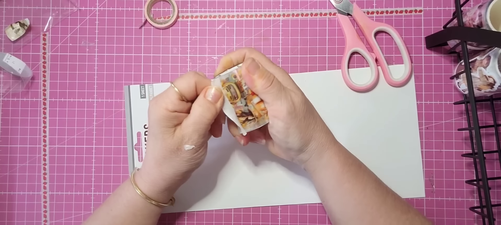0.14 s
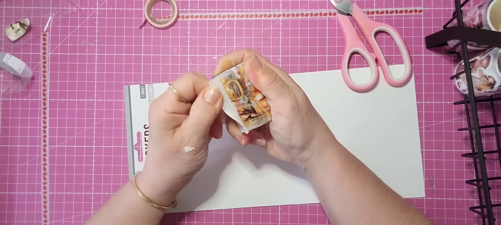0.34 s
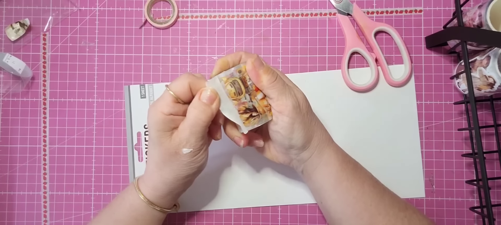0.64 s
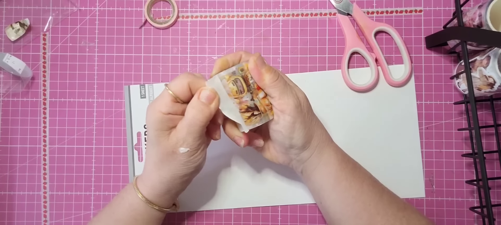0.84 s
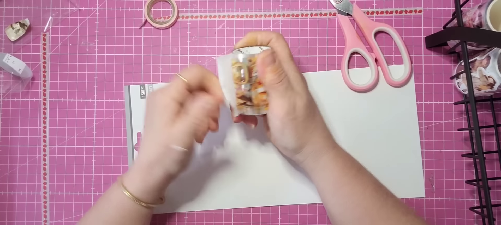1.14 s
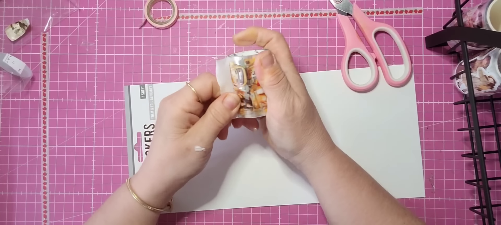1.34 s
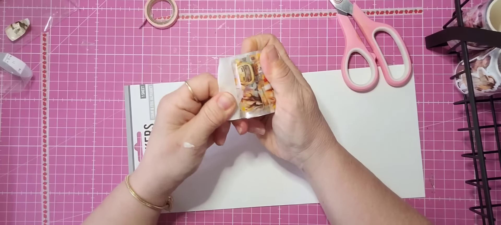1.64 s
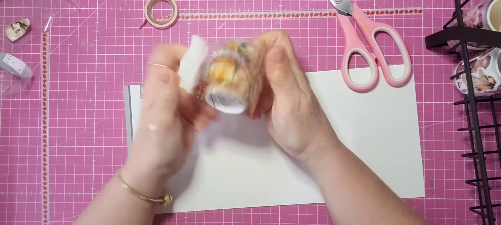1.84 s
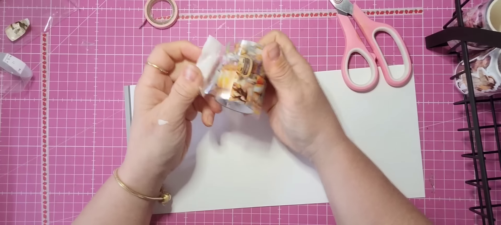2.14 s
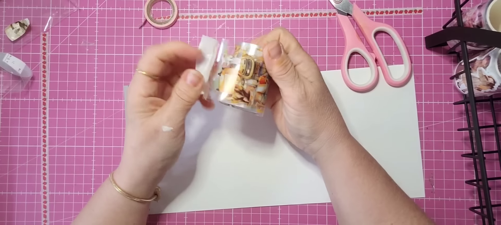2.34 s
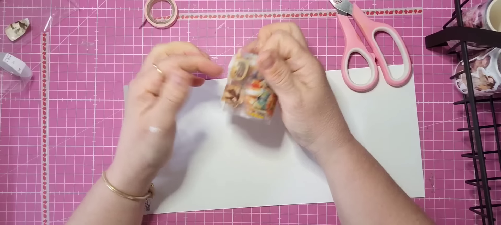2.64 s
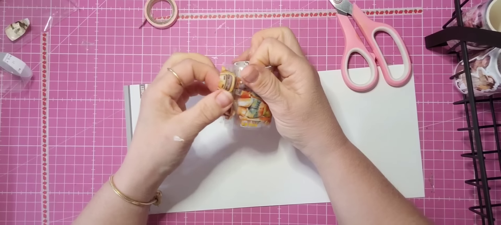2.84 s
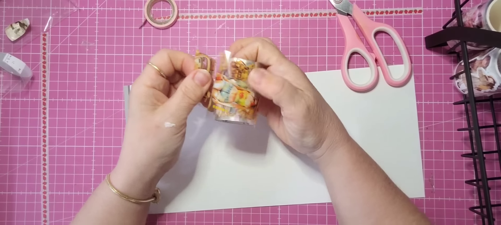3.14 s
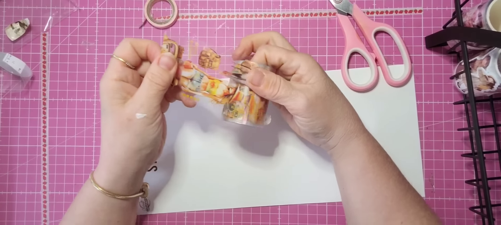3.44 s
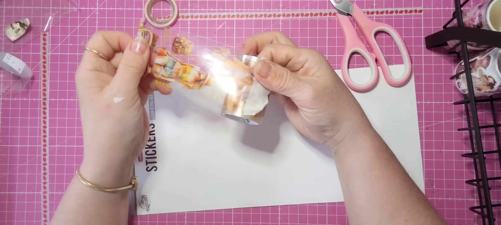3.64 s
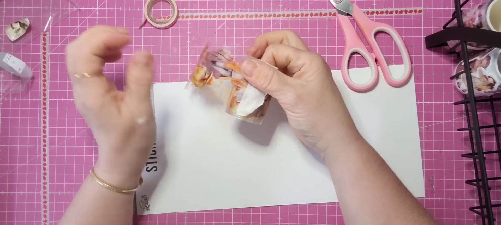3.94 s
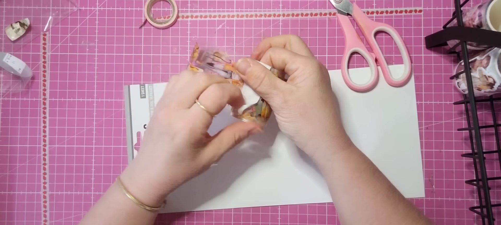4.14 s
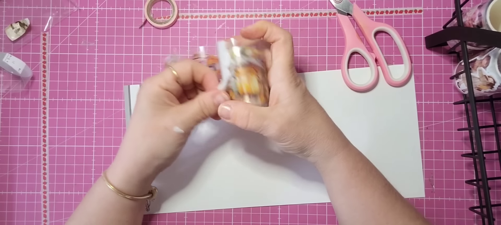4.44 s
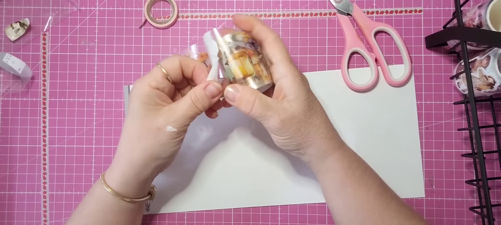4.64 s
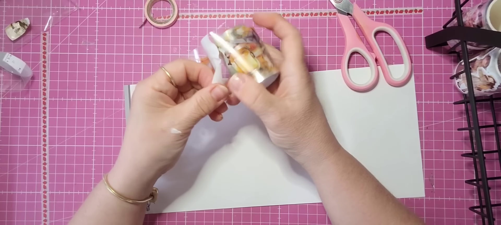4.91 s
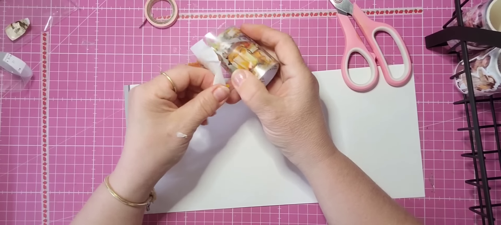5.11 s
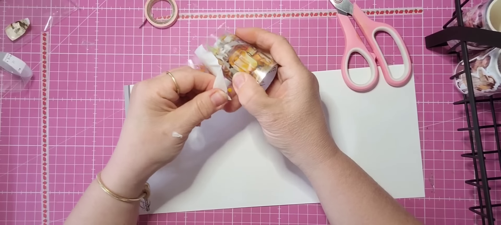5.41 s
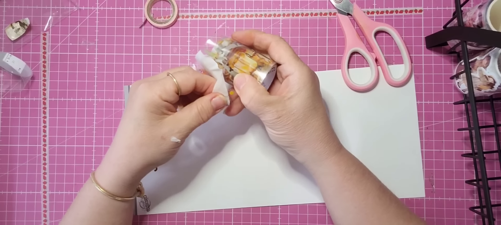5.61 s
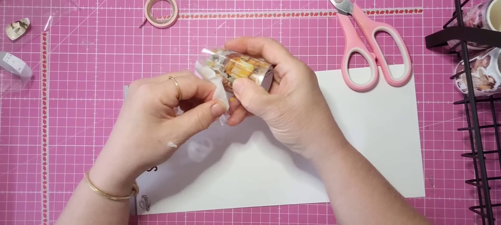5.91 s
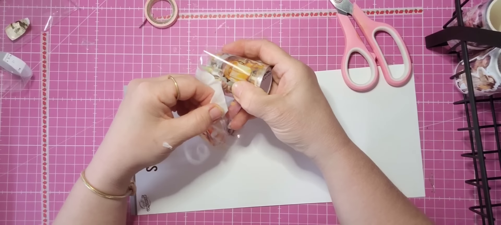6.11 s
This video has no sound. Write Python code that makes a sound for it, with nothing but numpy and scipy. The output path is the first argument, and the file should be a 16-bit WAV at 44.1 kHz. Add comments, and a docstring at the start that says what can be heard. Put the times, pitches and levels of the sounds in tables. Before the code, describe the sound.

Close, crisp handling of a film sticker roll over a desk. Thin glue crackle and bright clicks lead into a sudden hard snap, then a quick cluster of loud ones. The peeling turns papery and lighter, with a very faint coo-like bird tone. A hollow core thud and dull low thump from the shifting arms follow, then thinner rustles and ticks. Dry little room, close stereo pickup, quiet background.

```python
"""Hands unwind a roll of stickers on stiff film over a desk in a small quiet room; two ports listen.
First, broken glue threads crackle, film snaps as a struck resonator, and a dove's faint sine tones waver.
Near 1 s comes a loud snap, and from 1.5 to 2 s a dense run of them; the dove's last note falls at 3.4 s.
Near 3.9 s the cardboard core thuds under a snap; from 4.1 s shifting arms ring the stand and desk top.
Thinner crackle and snaps end the scene, over air hush made of filtered noise throughout."""
import sys
import numpy as np
from scipy import signal
from scipy.fft import rfft, irfft
from scipy.io import wavfile
from scipy.ndimage import uniform_filter1d

SR = 44100
rng = np.random.default_rng(int(sys.argv[2]) if len(sys.argv) > 2 else 0)


def put_to_file(sound):
    """Save the sound as 16-bit audio at rate SR, in the file named by the first command-line argument."""
    columns = np.atleast_2d(sound).T  # one column per channel
    safe = np.clip(columns, -1, 1)
    whole_steps = np.round(safe * 32767)
    wavfile.write(sys.argv[1], SR, whole_steps.astype(np.int16))


N = 276498

# Ports: colour of left over right [f/Hz, level/dB]
PORT_COLOUR = [(60, -6.5), (180, -5.5), (550, -3.5), (1650, 1), (4970, 1.5), (15000, 8.5)]
PORT_LAG_SAMPLES = 5   # right port after left
CUTOFF_HZ = 16812

# Early reflections from shelf and ceiling [delay t/s, level/dB]
REFLECTIONS = [(.0045, -17), (.0098, -14)]
# Diffuse tail for core, paper, film, sizzle [t60/s, energy level/dB, left-right likeness 0-1]
DIFFUSE_TAILS = [(.13, -5, .9), (.13, -5.5, .6), (.13, -6.5, .2), (.12, -6.5, .1)]

# Dove notes [start t/s, length t/s, f/Hz, level/dB]
DOVE_NOTES = [(0.09, 0.18, 580, -85), (0.337, 0.2, 560, -84), (1.015, 0.29, 559, -82),
              (3.372, 0.13, 604, -65)]

# Resonances of microphone stand and desk top [f/Hz, width f/Hz, level/dB]
STAND_MODES = [(45.9, 9.6, -0.5), (65, 19.7, -9)]
DESK_MODES = [(115.3, 19.3, 2), (169.8, 8.3, -3.5), (222, 77, -9), (320, 53, -10)]
# Arms shifting on the desk [full strength t/s, rise t/s, hold t/s, stand sway level/dB, desk top level/dB]
ARM_SHIFTS = [(1.003, .08, 0.046, -58.5, -78.5), (1.286, 0.21, 0.19, -55.5, -77.5),
              (1.883, 0.23, 0.23, -66.5, -83.5), (2.384, 0.25, 0.066, -64, -77.5),
              (3.102, 0.23, 0.11, -62.5, -87.5), (3.416, 0.16, 0.044, -70.5, -85.5),
              (3.882, .03, .03, -78, -72), (4.104, 0.069, 0.041, -45, -50), (4.31, .1, 0.044, -54, -62),
              (4.459, 0.18, 0.045, -53.5, -65), (4.783, 0.062, 0.03, -61.5, -56.5),
              (4.892, 0.11, 0.02, -58.5, -87), (5.059, .04, 0.022, -78, -66),
              (5.135, 0.13, 0.016, -61.5, -66), (5.69, .15, 0.22, -54.5, -77)]
SWAY_REST_DB, TOP_REST_DB = -77, -86.5
SHIFT_FALL_DB_PER_S, PULL_FALL_DB_PER_S = 133.5, 230.5
RISE_DB = 30   # every move climbs this far during its rise

# Resonances of cardboard core, backing paper, film and finest creases [f/Hz, width f/Hz, level/dB]
CORE_MODES = [(336, 153, -3.5), (513, 91, 2.5), (704, 265, 1.5), (1202, 1160, -6.5)]
PAPER_MODES = [(1435, 170, -8.5), (1935, 197, -1), (2478, 1330, -3), (3227, 1390, -2)]
FILM_MODES = [(3814, 460, 2), (4670, 1155, 5.5), (6520, 820, 3), (7350, 580, -0.5)]
SIZZLE_MODES = [(9850, 3150, -6), (12360, 1600, 3.5), (14460, 740, 7), (15100, 1500, 3)]
# Pulls that make the glue crackle
# [full strength t/s, rise t/s, hold t/s, film level/dB, depth (reach into paper and core) level/dB]
GLUE_PULLS = [(0, .05, 0.047, -56, -36), (0.12, 0.12, 0.052, -56, -25), (0.259, 0.014, 0.018, -53, -16.5),
              (0.334, .08, 0.2, -57, -21), (0.58, .08, 0.18, -65.5, -19),
              (0.756, 0.089, 0.041, -63.5, -16.5), (0.922, .1, 0.077, -68.5, -7),
              (1.03, 0.054, 0.061, -65, -18), (1.233, .025, 0.049, -58, -16),
              (1.346, 0.07, 0.16, -59, -16.5), (1.519, 0.037, 0.031, -51.5, -22),
              (1.773, 0.084, 0.031, -39, -13), (1.92, .07, 0.0067, -46.5, 2.5),
              (2.014, 0.074, 0.072, -58, 2.5), (2.18, 0.079, 0.019, -61.5, 2.5),
              (2.283, 0.043, 0.029, -54.5, -2.5), (2.391, 0.015, 0.037, -58.5, 3),
              (2.454, .08, 0.029, -49, -0.5), (2.725, .04, 0.11, -68.5, 0), (2.981, 0.093, 0.045, -60, 4.5),
              (3.062, .1, 0.32, -63, -5), (3.462, 0.092, 0.14, -55.5, -12.5),
              (3.675, 0.017, 0.027, -77, 10.5), (3.771, 0.041, 0.0075, -55.5, -3.5),
              (4.088, 0.014, 0.061, -70, 12.5), (4.182, 0.044, 0.018, -53, -11),
              (4.312, .1, 0.17, -56.5, -1), (4.538, 0.12, 0.13, -62.5, -4), (4.77, .04, 0.027, -54, 7),
              (4.855, 0.065, 0.15, -61.5, -4), (4.998, 0.09, 0.14, -63.5, -8.5),
              (5.253, 0.14, 0.23, -71.5, -7.5), (5.487, 0.22, 0.11, -65, -14.5),
              (5.624, 0.014, 0.021, -60, -7), (5.793, 0.14, 0.2, -70, -9.5),
              (5.922, 0.036, 0.063, -54.5, -7), (6.109, 0.076, 0.33, -57.5, -8.5)]
# Core, paper, film, sizzle [share of pull depth, crackle over film level/dB, crackle at rest level/dB]
PART_CRACKLE = [(1, -13, -89.5), (1.0, -2.5, -98), (0.048, -1, -80.5), (-0.18, -2.5, -82)]
# Snaps of film and glue
# [t/s, film energy level/dB, depth (reach into paper and core) level/dB, crispness (into creases) level/dB]
FILM_SNAPS = [(0.214, -28.5, -36, 3), (0.2642, -10, -46, -2.5), (0.3539, -14.5, -44, -3),
              (0.418, -24.5, -35, -2), (0.4994, -20, -28, -7), (.5273, -19.5, -23.5, 3.5),
              (0.6665, -24, -30, -1), (0.6899, -20.5, -25, -2.5), (.775, -36.5, -13, -8),
              (0.9855, 2, -14, -13.5), (1.284, -40, -27, -6), (1.4046, -33.5, -27, 18),
              (1.466, -43.5, 7.5, 10), (1.5181, -3, -17.5, 2.5), (1.7276, -23, -29, -6),
              (1.7516, -28, -19, 4), (1.7555, -16, -14, 8), (1.771, -2, -28, 0.5), (1.776, -5, -15, -15),
              (1.795, -4, -10.5, -11), (1.8031, -27, 13, 20.5), (1.8087, -28.5, 11, 9),
              (1.827, -12.5, -30, -7), (1.8424, -22, 3, -9), (1.8944, -22, -9, -3),
              (1.9003, -15.5, -13, -7.5), (1.9193, -21.5, 6.5, -10), (2.0538, -20, -10, -0.5),
              (2.1326, -15.5, 3.5, -7), (2.3932, -26.5, -2.5, -4), (2.422, -24.5, -4, -8),
              (2.4845, -12, -1, -3), (2.526, -13, -3, 0), (2.5496, -35.5, 11.5, 4),
              (2.7594, -20, -13.5, 1.5), (2.798, -23.5, -15, -5), (2.8214, -19.5, -11.5, -3.5),
              (3.004, -21, 0, -5.5), (3.351, -23.5, -4, 4), (3.682, -47, 13.5, -16), (3.792, -25, -11, -13),
              (3.8737, -3.5, -13, -9.5), (3.878, -32.5, 26.5, -21), (4.099, -28, -1, 0),
              (4.5659, -20.5, -2.5, 3), (4.774, -46, 26, 0), (4.802, -25, -17, 0.5), (4.883, -26.5, 1.5, 1),
              (4.9744, -23, -9, -3.5), (5.522, -36.5, -30, 5), (5.634, -26.5, -6, -7),
              (5.934, -29.5, -5, -2), (6.0395, -25, -20.5, -2), (6.0947, -27, -26, -0.5),
              (6.1662, -25.5, -9, -5)]
# Fingers knocking the cardboard core [t/s, energy level/dB]
CORE_KNOCKS = [(1.2834, -41.5), (2.526, -15), (3.8732, -12.5), (4.1, -21.5), (4.1145, -23.5), (4.883, -22),
               (5.15, -36.5)]
SKIN_HISS = 0.59             # smooth rub of fingers, relative to crackle
CORE_UNDER_PAPER_DB = 14.5   # in a snap


def from_db(db):
    """Logarithmic level: twenty decibels are a factor of ten in amplitude."""
    return 10 ** (np.asarray(db) / 20)


def rms_one(x):
    """Normalisation to unit root mean square."""
    return x / np.sqrt(np.mean(x ** 2) + 1e-20)


def drift(rate_hz):
    """Low-pass random process: noise through a double pole, of unit rms, drawn at every 50th sample."""
    r = np.exp(-100 * np.pi * rate_hz / SR)
    noise = rng.standard_normal(N // 50 + 1002)
    slow = signal.lfilter([1], [1, -2 * r, r * r], noise)[1000:]   # without the start-up
    return np.interp(np.arange(N) / 50, np.arange(len(slow)), rms_one(slow))


def swells(s, rise_s, hold_s, levels_db, fall_db_per_s, rest_db):
    """Power addition of envelopes that are linear in decibels, over a level at rest."""
    t = np.arange(0, N, 50)[:, None] / SR
    climb_db = RISE_DB * np.maximum(s - t, 0) / np.abs(rise_s)
    fall_db = fall_db_per_s * np.maximum(t - s - np.abs(hold_s), 0)
    move_gain = from_db(levels_db - climb_db - fall_db)
    gain = np.sqrt(np.sum(move_gain ** 2, axis=1) + from_db(rest_db) ** 2)
    return np.interp(np.arange(N) / SR, t[:, 0], gain)


def body(x, modes, wander_db=0):
    """Modal superposition: parallel resonances of alternating sign, each struck now harder, now softer."""
    pulse = np.r_[1., np.zeros(SR // 2)]
    response, out = 0, 0
    for k, (hz, width_hz, level_db) in enumerate(modes):
        r = np.exp(-np.pi * width_hz / SR)
        zeros = (-1) ** k * from_db(level_db) * (1 - r * r) * np.array([1, 0, -1])
        poles = [1, -2 * r * np.cos(2 * np.pi * hz / SR), r * r]
        response = response + signal.lfilter(zeros, poles, pulse + 1e-18)
        bend = from_db(wander_db * drift(6)) if wander_db else 1
        out = out + signal.lfilter(zeros, poles, bend * x + 1e-18)
    return out / np.linalg.norm(response)   # steadily driven white noise keeps its rms


def in_room(x, t60_s, tail_db, alike):
    """Direct sound, early reflections, then a diffuse tail: fresh noise under exponentially decaying power."""
    early = np.zeros((2, SR // 40))
    early[[0, 1], [0, PORT_LAG_SAMPLES]] = 1
    for late_s, level_db in REFLECTIONS:
        arrivals = int(late_s * SR) + rng.integers(0, 12, 2)
        early[[0, 1], arrivals] += from_db(level_db)
    direct = signal.fftconvolve(x[None], early, axes=1)[:, :N]

    keep = from_db(-120 / (t60_s * SR))   # power kept per sample: 60 dB lost in t60
    fed_power = np.roll(uniform_filter1d(x ** 2, 60), 70)
    power = signal.lfilter([1 - keep], [1, -keep], fed_power + 1e-18)
    shared, side = rng.standard_normal((2, N))
    noise = np.sqrt((1 + alike) / 2) * shared + np.sqrt((1 - alike) / 2) * side * [[1], [-1]]
    return direct + from_db(tail_db) * np.sqrt(np.abs(power)) * noise


def still_air():
    """Stationary noise: a faint hush, shaped by the same resonances as the paper."""
    return from_db(-95.5) * body(rng.standard_normal(N), PAPER_MODES)


def dove():
    """Frequency and amplitude modulation: soft wavering sine tones that swell and fade."""
    out, t = np.zeros(N), np.arange(N) / SR
    wavering_time = np.cumsum(1 + .02 * drift(20)) / SR
    tremble_db = 2.9 * drift(40)
    for s, length_s, hz, level_db in DOVE_NOTES:
        swell = np.sin(np.pi * np.clip((t - s) / length_s, 0, 1) ** 0.61)
        out += from_db(level_db + tremble_db) * swell * np.sin(2 * np.pi * hz * wavering_time)
    return out


def desk_shake():
    """Forced vibration: lumpy random pushes ring the stand and the desk top."""
    *timing, sway_db, top_db = np.transpose(ARM_SHIFTS)
    lean = swells(*timing, sway_db, SHIFT_FALL_DB_PER_S, SWAY_REST_DB) * from_db(0.88 * drift(12))
    sway = body(lean * rng.standard_normal(N), STAND_MODES)
    # pushes mostly shared by both ports, partly separate
    pushes = rng.standard_normal(N) + 0.48 * rng.standard_normal((2, N))
    press = swells(*timing, top_db, SHIFT_FALL_DB_PER_S, TOP_REST_DB) * from_db(2.0 * drift(12))
    top = body(press * pushes, DESK_MODES)
    # the ports hear little below the sway
    return signal.sosfilt(signal.butter(4, 40, "high", fs=SR, output="sos"), sway + top)


def crackle(base_per_s, spread_db, clump_db):
    """Random point process: glue threads break in clumps, a few much louder than the rest."""
    breaks = rng.random(N) < base_per_s * from_db(clump_db * drift(25)) / SR
    loudness_db = spread_db * np.minimum(rng.exponential(1, N), 5)
    sizes = from_db(loudness_db) * rng.choice([-1, 1], N)
    return rms_one(breaks * sizes)


def snaps(times, levels_db, die_s):
    """Impulsive excitation: a sharp first pulse, then a rattle of exponentially dying noise."""
    out, t = np.zeros(N + 200), np.arange(200) / SR
    rattle = rng.standard_normal((len(times), 200)) * np.exp(-t / die_s)
    rattle[:, 0] += 3.9 * np.sign(rattle[:, 0])
    for s, level_db, burst in zip(times, levels_db, rattle):
        at = round(s * SR)
        out[at:at + 200] += from_db(level_db) * burst / np.linalg.norm(burst)
    return out[:N]


def sticker_roll():
    """Source and resonator: crackle and snaps excite the core, backing paper, film and finest creases."""
    *timing, pull_db, pull_depth_db = np.transpose(GLUE_PULLS)
    peel = []
    for share, over_db, rest_db in PART_CRACKLE:
        part_db = pull_db + over_db + share * pull_depth_db
        peel.append(swells(*timing, part_db, PULL_FALL_DB_PER_S, rest_db))

    grains = crackle(base_per_s=2000, spread_db=5.5, clump_db=5.0)
    grains = rms_one(grains + SKIN_HISS * rng.standard_normal(N))
    slides = crackle(base_per_s=900, spread_db=2.5, clump_db=6.0)

    at, snap_db, depth_db, crisp_db = np.transpose(FILM_SNAPS)
    core_snaps = snaps(at, snap_db + depth_db - CORE_UNDER_PAPER_DB, die_s=0.00073)
    knocks = snaps(*np.transpose(CORE_KNOCKS), die_s=0.00031)
    core = peel[0] * slides + core_snaps + knocks
    paper = peel[1] * (slides + 0.083 * grains) + snaps(at, snap_db + depth_db, die_s=0.000067)
    film = peel[2] * grains + snaps(at, snap_db, die_s=0.0011)
    sizzle = peel[3] * grains + snaps(at, snap_db + crisp_db, die_s=0.00081)

    blows = [core, paper, film, sizzle]
    modes = [CORE_MODES, PAPER_MODES, FILM_MODES, SIZZLE_MODES]
    core, paper, film, sizzle = [body(in_room(blow, *tail), part_modes, wander_db=1.8)
                                 for blow, tail, part_modes in zip(blows, DIFFUSE_TAILS, modes)]
    no_bass = signal.butter(3, 3600, "high", fs=SR, output="sos")   # thin film radiates no bass
    no_boom = signal.butter(2, 1300, "high", fs=SR, output="sos")
    return core + signal.sosfilt(no_boom, paper) + signal.sosfilt(no_bass, film + sizzle)


def scene():
    """Linear superposition of still air, the roll in its room, the shaken desk and the dove."""
    air = still_air()
    return sticker_roll() + desk_shake() + dove() + air


def record(dry):
    """Linear filtering: the ports differ in colour, and a low-pass cuts the top."""
    hz, balance_db = np.transpose(PORT_COLOUR)
    bins_hz = np.arange(N // 2 + 1) * SR / N + 1   # 1 Hz up, to keep the logarithm finite
    half_balance_db = np.interp(np.log(bins_hz), np.log(hz), balance_db) / 2
    tilt = from_db(half_balance_db * [[1], [-1]])
    ports = irfft(rfft(dry) * tilt, N)
    return signal.sosfilt(signal.cheby2(12, 70, CUTOFF_HZ, fs=SR, output="sos"), ports)


dry = scene()
out = record(dry)
put_to_file(out)
```